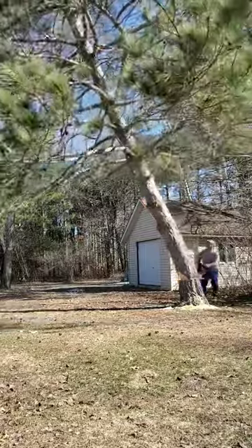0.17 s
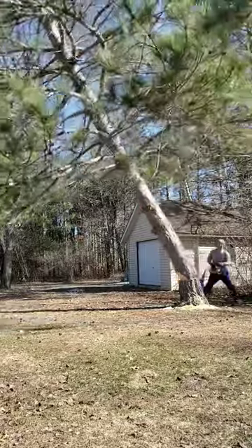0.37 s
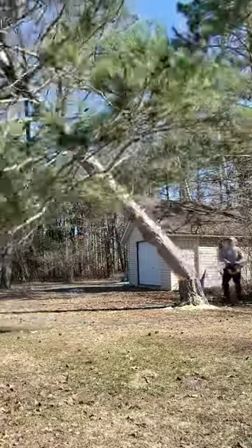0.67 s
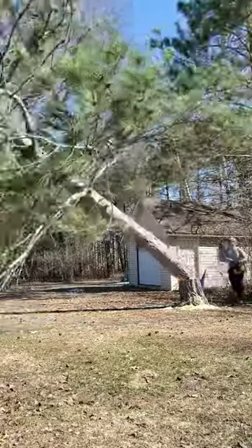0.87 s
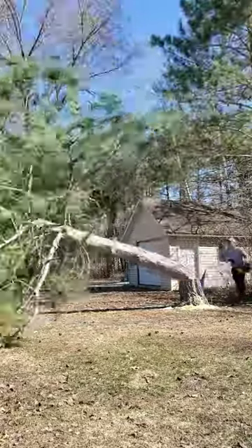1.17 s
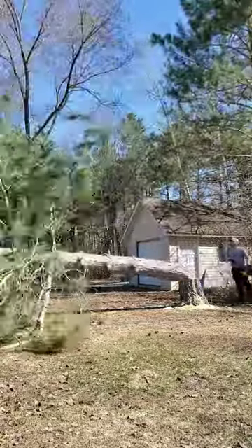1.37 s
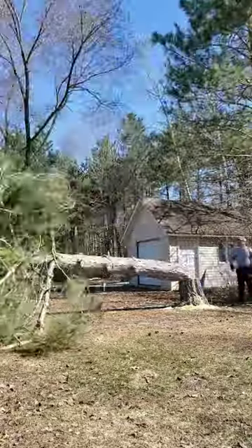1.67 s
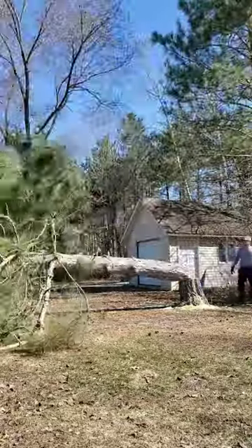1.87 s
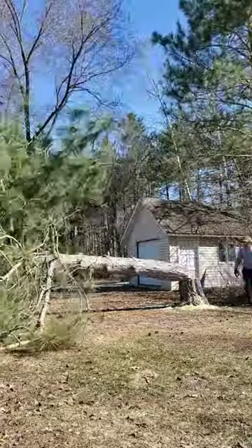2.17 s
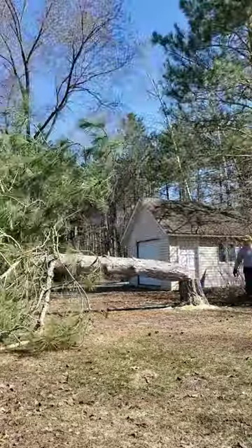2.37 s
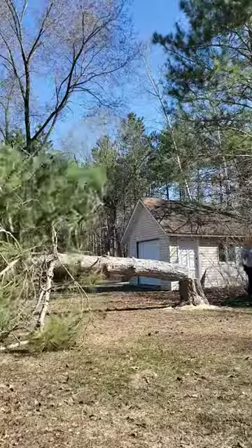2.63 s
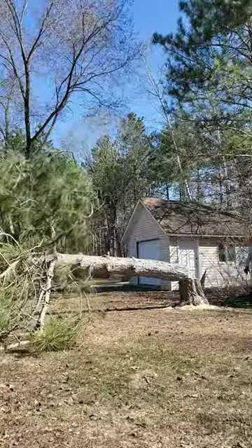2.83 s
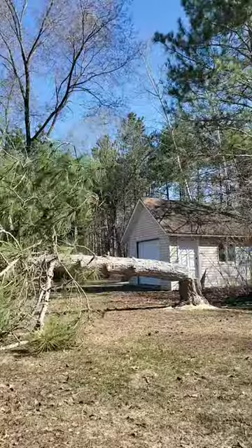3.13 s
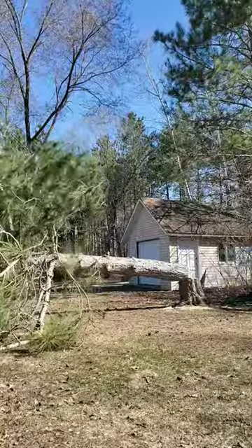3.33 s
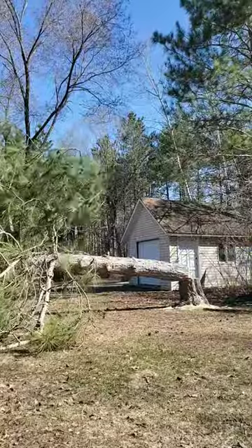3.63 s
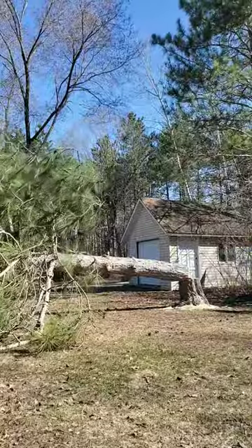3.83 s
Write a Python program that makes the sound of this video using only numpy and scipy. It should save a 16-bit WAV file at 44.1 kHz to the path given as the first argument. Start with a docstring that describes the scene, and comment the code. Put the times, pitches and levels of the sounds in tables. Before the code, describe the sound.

A pine tree cracks, splinters and crashes down in a yard, with wind buffeting the microphone

```python
"""Woodland yard, phone microphone with two ports: from the start gusts buffet each port, over faint distant air.
A pine topples across the yard: limbs snap and splinter for over a second and a half, echoing off trees and shed.
From about one second heavy limbs meet the ground and the crown of needles sweeps it, then sways out by two.
Towards three seconds hard gusts return, with a few faint late snaps. Breaks are shaped bursts of fibre clicks
through wood modes; needles, wind and air are coloured noise; thuds and single buffets are decaying tones."""
import sys
import numpy as np
from scipy import signal
from scipy.fft import rfft, irfft
from scipy.io import wavfile
from scipy.ndimage import uniform_filter1d

SR = 44100
rng = np.random.default_rng(int(sys.argv[2]) if len(sys.argv) > 2 else 0)


def unload_wav(signal):
    """Save mono or channel-first audio to the path in sys.argv[1] as 16-bit WAV at rate SR, clipped to [-1, 1]."""
    wavfile.write(
        sys.argv[1],
        SR,
        np.round(np.clip(np.atleast_2d(signal).T, -1, 1) * 32767).astype(np.int16),
    )


def gain_from_db(level_db):
    """Convert decibel levels to linear amplitude factors (20 dB per decade)."""
    decades = np.asarray(level_db, float) / 20
    return 10 ** decades


N = 4 * SR

# Distant woodland hush. Each row: frequency in Hz, relative density in dB per Hz.
AIR_SPECTRUM = [(40, -34), (150, -4), (350, -0.5), (800, -6), (1350, -20.5), (3000, -37), (6600, -60)]
# Crown sweeping air and ground, before the trim of each layer.
# Each row: time in seconds, swish level in dB, fine hiss level in dB, level of rubbing boughs in dB.
NEEDLE_LEVELS = [(0.0, -49, -95, -44.5), (0.2, -67, -72.5, -64.5), (0.39, -67, -81, -63.5),
                 (0.52, -59.5, -87, -53), (0.66, -60.5, -71, -62), (0.87, -63.5, -80, -60),
                 (1.01, -62.5, -79, -69), (1.1, -51.5, -63, -46.5), (1.22, -50.5, -58, -56.5),
                 (1.36, -49, -61, -46), (1.54, -50.5, -58.5, -54), (1.75, -55.5, -60.5, -54.5),
                 (1.9, -61, -67, -55), (2.06, -68, -72.5, -64), (2.23, -70, -74, -72.5),
                 (2.72, -69, -71, -72.5), (2.92, -67, -72, -82), (3.12, -71, -76.5, -70),
                 (3.78, -72.5, -80.5, -73), (4.0, -73.5, -83, -72)]
# Needles swishing. Each row: frequency in Hz, relative density in dB per Hz.
SWISH_SPECTRUM = [(400, -37), (1200, -10.5), (2200, -2), (4000, 1), (6000, -0.5), (7500, -16.5),
                  (9750, -38)]
# Fine hiss of needles and of breaking wood. Each row: frequency in Hz, relative density in dB per Hz.
HISS_SPECTRUM = [(4410, -3.5), (7500, -2), (9280, 0), (11000, -1.5), (14200, -7), (15500, -10.5)]
# Boughs rubbing. Each row: frequency in Hz, relative density in dB per Hz.
BOUGH_SPECTRUM = [(200, -26), (350, -5), (900, -2), (1500, -2.5), (2400, -11), (4000, -44)]
# Wind on the two ports. Each row: time in seconds, level in dB, left minus right in dB.
GUSTS = [(0.0, -38.5, 25), (0.05, -50, 25), (0.33, -51, 31), (0.45, -57.5, 7), (0.52, -50, 12),
         (0.62, -46, 25), (0.66, -65.5, 14), (0.72, -44, 3), (0.93, -64.5, 7), (1.05, -53.5, 2),
         (1.19, -83, 11), (1.38, -49, -5.5), (1.5, -71, 7), (1.8, -57, 0), (2.0, -66.5, 1), (2.13, -58, 1),
         (2.22, -64.5, 2), (2.745, -63, -2), (2.765, -49, -7), (2.98, -46, -2.5), (3.12, -44, 7),
         (3.25, -41.5, -3), (3.45, -50.5, 1.5), (3.7, -49, 2), (3.8, -45, -11), (4.0, -49.5, -6)]
# Light buffeting of a port. Each row: frequency in Hz, relative density in dB per Hz.
CALM_SPECTRUM = [(20, -3), (70, 0), (240, -21), (450, -31), (1170, -41), (1980, -120)]
# Hard buffeting of a port. Each row: frequency in Hz, relative density in dB per Hz.
STRONG_SPECTRUM = [(20, -18), (64, -1.5), (104, -10.5), (244, -14.5), (682, -41.5), (1200, -72),
                   (2640, -120)]
# Single hard buffets. Each row: start in seconds, level at the louder port in dB, pitch in Hz,
# left minus right in dB.
BUFFETS = [(.009, -25, 58.6, 24), (.022, -28, 64, 23), (0.086, -30.5, 82, 17), (0.136, -35.5, 61, 2),
           (0.287, -37.5, 83, 15), (0.315, -36, 75.6, 28), (.525, -36, 82, 15), (0.696, -31, 66.7, 14),
           (.724, -31, 106, 6), (2.756, -38, 76.5, 10), (2.811, -36.5, 114, 4.5), (2.91, -36, 99, -24),
           (2.953, -33, 85.4, -6), (2.979, -36, 98, -16), (3.066, -27, 81.4, 1), (3.194, -34, 80.4, -5),
           (3.223, -27, 88.6, -8), (3.238, -20, 89.8, 3), (3.286, -24.5, 89, -13), (3.332, -30, 71, -4),
           (3.364, -29, 76, 8), (3.527, -34, 81, -0.5), (3.607, -30, 82.7, -3), (3.645, -29, 127.8, -11),
           (3.672, -28, 70.5, 4), (3.708, -30, 78, 6), (3.755, -27, 150.5, 0), (3.789, -36, 130.5, -24),
           (3.86, -29, 66, -30), (3.935, -36, 64.5, 0.5)]
# Single breaks of limbs and twigs. Each row: time in seconds, level in dB before the common trim,
# centre in Hz, hiss against body in dB before its trim, length in seconds.
SNAPS = [(.005, -30.5, 3060, -24, 0.015), (.024, -29.5, 4340, -10.5, 0.012), (.215, -52.5, 5000, -1, 0.015),
         (.260, -36, 4140, -9.5, 0.015), (.339, -42, 2400, -28, 0.012), (.357, -27.5, 2370, -21, 0.011),
         (.435, -30, 1930, -34, 0.018), (.592, -32.5, 2810, -14, .018), (.661, -26.5, 2590, -24.5, 0.012),
         (.710, -40, 5700, -7, 0.0099), (.762, -25.5, 1950, -21.5, .012), (.783, -26.5, 1680, -45, 0.0143),
         (.850, -25.5, 2410, -26, 0.015), (.995, -32.5, 2640, -18, 0.017), (1.102, -30, 3700, -3.5, 0.02),
         (1.121, -32, 1850, -27, 0.017), (1.141, -28, 2850, -14, 0.013), (1.222, -28.5, 2800, -30, 0.016),
         (1.254, -31, 3100, -31, 0.015), (1.275, -36, 4540, -7, .016), (1.324, -29, 3060, -10.5, 0.02),
         (1.414, -37.5, 2370, -5, 0.014), (1.453, -38, 3440, -27, 0.0068), (1.473, -25.5, 1110, -26, 0.015),
         (1.552, -26.5, 1970, -18, 0.02), (2.334, -51, 3680, -28, 0.027), (2.617, -56.5, 3480, -2, 0.022),
         (2.838, -48.5, 4630, -16, 0.014), (2.958, -59.5, 4300, 2, 0.033), (3.391, -54, 2040, -8, 0.012)]
# Wood tearing along the grain. Each row: time in seconds, level in dB before the common trim,
# centre in Hz, hiss against body in dB before its trim, length in seconds.
TEARS = [(.040, -44, 1430, -30, 0.051), (.380, -47, 2640, -19, 0.052), (.451, -27, 1208, -62, 0.045),
         (.468, -28, 3430, -54, 0.031), (.488, -32, 1310, -50, 0.061), (.522, -35.5, 1160, -32, .03),
         (.543, -32, 2310, -25, 0.035), (.575, -36.5, 1220, -31, 0.048), (.675, -41.5, 1500, -40, 0.036),
         (.804, -30, 1290, -34, 0.041), (.832, -29.5, 1170, -41, 0.038), (.883, -32.5, 2740, -18.5, 0.043),
         (.915, -45.5, 1790, -15, 0.047), (.958, -28.5, 1710, -46, 0.024), (1.021, -30, 930, -21.5, 0.044),
         (1.048, -34, 1150, -13, .04), (1.158, -32, 2660, -8.5, 0.038), (1.342, -33.5, 1090, -21, .035),
         (1.370, -30.5, 4260, -7.5, 0.04), (1.392, -40.5, 1750, -1, .045), (1.503, -39, 2400, -3.5, .035),
         (1.585, -36.5, 1830, -6, 0.052), (1.652, -38, 2100, -4.5, 0.054)]
# Body of splintering wood. Each row: frequency in Hz, relative density in dB per Hz.
WOOD_SPECTRUM = [(120, -30), (300, -16.5), (600, -17), (1100, -24), (3790, -15.5), (7500, -34),
                 (16500, -120)]
# Modes of a limb. Each row: frequency in Hz, relative level in dB, nominal ring time in seconds.
LIMB_MODES = [(650, 23, 0.025), (776, 22, 0.0096), (1170, 20, 0.024), (1330, 11.5, 0.0066),
              (2338, 4.5, 0.047), (2640, -11, 0.027), (3580, -14, 0.048), (3990, -17, 0.016)]
# Heavy limbs meeting the ground. Each row: start in seconds, level in dB, pitch in Hz.
THUDS = [(0.997, -45, 426), (1.04, -45.5, 124), (1.473, -40.5, 218), (1.553, -40.5, 229)]
# Echoes off trees and shed. Each row: frequency in Hz, time to fall by 60 dB in seconds.
YARD_DECAY = [(300, 0.31), (1200, 0.8), (3500, 0.41), (12000, 0.074)]
# Brief dips of the whole sound. Each row: middle in seconds, length in seconds, depth in dB.
DIPS = [(0.345, 0.0091, -5), (0.426, 0.014, -10.5), (0.647, 0.011, -6), (0.764, 0.026, -5.5),
        (1.101, 0.045, -8.5), (1.238, 0.022, -6)]


def evened(x):
    """Scales to unit rms."""
    return x / np.sqrt(np.mean(x ** 2) + 1e-20)


def read(points, hz):
    """Reads a table of (Hz, value) along a logarithmic frequency axis."""
    f, value = np.transpose(points)
    return np.interp(np.log(hz + 1), np.log(f + 1), value)


def column(table, index, t):
    """Follows one column of a table timed by its first column."""
    rows = np.array(table)
    return np.interp(t, rows[:, 0], rows[:, index])


def coloured(x, gain):
    """Filters rows of x by a gain given on the bins of their transform."""
    return irfft(rfft(x) * gain, x.shape[-1])


def drift(seconds, shape):
    """Slow chance of unit rms along the last axis: noise averaged twice."""
    size = max(int(seconds * SR), 2)
    smooth = uniform_filter1d(rng.standard_normal(shape), size)
    return evened(uniform_filter1d(smooth, size))


def patchy(spectrum, patchy_db, flicker_db):
    """Noise drawn apart for each port, with small patches and a flicker shared by both."""
    frames, hz = N // 64 + 5, np.fft.rfftfreq(256, 1 / SR)
    z = rng.standard_normal((2, 129, frames)) + 1j * rng.standard_normal((2, 129, frames))
    patches = uniform_filter1d(rng.standard_normal((129, frames)), 10, axis=0)
    patches = evened(uniform_filter1d(patches, 24, axis=1))
    flicker = evened(uniform_filter1d(rng.standard_normal(frames), size=9))
    z *= gain_from_db(read(spectrum, hz)[:, None] + patchy_db * patches + flicker_db * flicker)
    noise = signal.istft(z, nperseg=256, noverlap=192)[1]
    return evened(noise[:, :N])


def add(mix, s, sound):
    """Lays a sound into the mix from s seconds, trimmed at both ends of the mix."""
    skip = max(-round(s * SR), 0)
    part = mix[:, max(round(s * SR), 0):][:, :sound.shape[1] - skip]
    part += sound[:, skip:skip + part.shape[1]]


def air():
    """Distant woodland hush: steady coloured noise, drawn apart for each port."""
    hz = np.fft.rfftfreq(N, 1 / SR)
    noise = rng.standard_normal((2, N))
    return gain_from_db(-68) * evened(coloured(noise, gain_from_db(read(AIR_SPECTRUM, hz))))


def twigs():
    """Sparse small cracks of eight sizes, each a short rough ring."""
    PER_S, T60_S, RISE_S = 18, 0.036, 0.00084  # rate is for each size
    t, out = np.arange(900) / SR, np.zeros((2, N))
    for hz in np.geomspace(900, 5500, 8):
        strength = gain_from_db(1.6 * np.minimum(rng.exponential(1, N), 2.5))
        train = (rng.random(N) < PER_S / SR) * strength
        rough = evened(uniform_filter1d(rng.standard_normal((2, 900)), size=12))
        envelope = gain_from_db(-60 * t / T60_S) * np.minimum(t / RISE_S, 1)
        ring = rough * np.sin(2 * np.pi * hz * t) * envelope
        out += signal.oaconvolve(train[None], ring, axes=1)[:, :N]
    return gain_from_db(-2.5) * evened(out)


def needles(t):
    """Crown of needles: a broad swish with twigs and a fine hiss, grainy with ticks, over lumpy boughs."""
    ticks = 1 + 0.13 * np.clip(drift(0.00078, N) - 1.2, 0, 1.4) ** 2
    swish = patchy(SWISH_SPECTRUM, patchy_db=2.0, flicker_db=-1.0) + twigs()
    hiss = patchy(HISS_SPECTRUM, patchy_db=0.7, flicker_db=1.5)
    boughs = patchy(BOUGH_SPECTRUM, patchy_db=3.5, flicker_db=0)
    swish = swish * gain_from_db(column(NEEDLE_LEVELS, 1, t) + 1.0)
    hiss = hiss * gain_from_db(column(NEEDLE_LEVELS, 2, t) + 6.0)
    boughs = boughs * gain_from_db(column(NEEDLE_LEVELS, 3, t) - 0.5)
    return ticks * (swish + hiss) + boughs


def wind(t):
    """Lumpy eddies, mostly separate on each port; hard gusts take another colour; single buffets on top."""
    CALM_DB, STRONG_DB = -54, -36  # gust levels of purely light and purely hard buffeting
    BOTH, STEADY = 0.14, 0.39  # share crossing to the other port; how far swells are evened out
    LUMP_DB, LUMP_S, BUFFET_T60_S = 5.5, 0.012, 0.16
    hz, db = np.fft.rfftfreq(N, 1 / SR), column(GUSTS, 1, t)
    eddies = rng.standard_normal((2, N))
    eddies = eddies + BOTH * eddies[::-1]
    calm = evened(coloured(eddies, gain_from_db(read(CALM_SPECTRUM, hz))))
    strong = evened(coloured(eddies, gain_from_db(read(STRONG_SPECTRUM, hz))))
    hard = np.clip((db - CALM_DB) / (STRONG_DB - CALM_DB), 0, 1)
    flow = (1 - hard) * calm + hard * strong
    power = uniform_filter1d(uniform_filter1d(flow ** 2, size=1500), size=1500)
    swell = np.sqrt(power + 0.011)
    lumps = gain_from_db(LUMP_DB * drift(LUMP_S, (2, N)))
    # the lean between the ports leaves their joint power alone
    lean = gain_from_db(np.clip(column(GUSTS, 2, t), -30, 30) * np.array([[.5], [-.5]]))
    lean = lean / np.sqrt((lean ** 2).mean(0))
    mix = gain_from_db(db) * lean * evened(flow / swell ** STEADY * lumps)
    for row in BUFFETS:
        add(mix, *thud(*row, BUFFET_T60_S))
    return mix


def crack(start, db, centre_hz, treble_db, length, rise, fall):
    """A burst of fibres parting, coloured by the limb's size, ringing in its modes and in loose splinters."""
    FIBRES_PER_S, FIBRE_SPREAD_DB, GRIT_DB, GRIT_S = 9000, 5.5, 1.8, .003
    WIDTH_OCT, BODY_DB, RING_DB, SPLINTER_DB = 0.42, 1, -2.5, -2.5
    LEVEL_TRIM_DB, HISS_TRIM_DB = -9, 3
    LIMB_SPREAD = .07  # modes shift by up to this share from break to break
    size, length = 8192, np.clip(length, .004, .1)
    t, hz = np.arange(size) / SR, np.fft.rfftfreq(size, 1 / SR)
    u = t / length
    falling = np.exp(-((u - rise) / (0.71 * (1 - rise))) ** fall)
    shape = np.where(u < rise, (u / rise) ** 1.5, falling)
    draw = rng.random((3, 2, size))
    clicks = (draw[0] < FIBRES_PER_S / SR) * np.sign(draw[1] - .5)
    fibres = clicks * gain_from_db(-FIBRE_SPREAD_DB * np.log(draw[2] + 0.014))
    grit = gain_from_db(GRIT_DB * drift(GRIT_S, size))
    fibres = evened(fibres * grit * shape) * np.sqrt(np.mean(shape ** 2))

    hump = np.exp(-.5 * (np.log2((hz + 1) / centre_hz) / WIDTH_OCT) ** 2) * (hz < 7300)
    limb = 1 + LIMB_SPREAD * (2 * draw[2, 0, 0] - 1)
    ring = 0
    for f, mode_db, ring_s in LIMB_MODES:
        nearness = np.exp(-.5 * (np.log2(f / centre_hz) / 0.48) ** 2)  # modes near the centre speak most
        ring = ring + gain_from_db(mode_db) * nearness / (1 + 2j * (hz - f * limb) * ring_s / 1.4)
    loose_hz = np.minimum(centre_hz * 2 ** (1.15 * (2 * draw[0, 0, :6] - 1)), 6800)
    splinters = sum(1 / (1 + 2j * (hz - f) * 0.02 / 1.13) for f in loose_hz)
    low = evened(hump) + gain_from_db(BODY_DB) * evened(gain_from_db(read(WOOD_SPECTRUM, hz)))
    for modes, modes_db in ((ring, RING_DB), (splinters, SPLINTER_DB)):
        low = low + gain_from_db(modes_db) * modes / np.sqrt(np.mean(abs(modes) ** 2))
    low = low / np.sqrt(np.mean(abs(low) ** 2))
    high = gain_from_db(treble_db + HISS_TRIM_DB) * evened(gain_from_db(read(HISS_SPECTRUM, hz)))
    sound = gain_from_db(db + LEVEL_TRIM_DB) * coloured(fibres, low + high)
    return start - .3 * rise * length, sound


def limbs():
    """The falling wood: sharp snaps, slower tears and ground thuds, with their echoes across the yard."""
    mix = np.zeros((2, N))
    # rise is a share of the length, fall a power
    for table, rise, fall in ((SNAPS, .33, 1.15), (TEARS, .25, 2.8)):
        for row in table:
            add(mix, *crack(*row, rise, fall))
    for row in THUDS:
        add(mix, *thud(*row, pan_db=0, t60=0.081))
    return mix + gain_from_db(-15.5) * yard(mix)


def thud(start, db, hz, pan_db, t60):
    """A dull push of wavering pitch that dies at once, for a limb on the ground or a buffet on the ports."""
    t = np.arange(8192) / SR
    wobble = 1 + 0.16 * (drift(0.0081, 8192) + 0.75 * drift(0.0079, (2, 8192)))
    port_db = db + pan_db * np.array([[.5], [-.5]]) - .5 * abs(pan_db)
    level = gain_from_db(port_db - 60 * t / t60) * np.minimum(t * hz / 0.44, 1)
    turn = 2 * np.pi * np.cumsum(hz * wobble, axis=1) / SR
    return start, level * np.sin(turn + 0.35 * np.sin(turn))


def yard(x):
    """Sparse echoes of random sign off trees and shed, each band dying at its own speed."""
    taps = np.zeros((2, SR))
    at = np.arange(400, SR - 20, 20) + rng.integers(0, 20, (2, (SR - 401) // 20))
    np.put_along_axis(taps, at, rng.choice([-1., 1.], at.shape), 1)
    hz, t, z = signal.stft(taps, SR, nperseg=256)
    t60 = np.maximum(read(YARD_DECAY, hz), .02)[:, None]
    tail = signal.istft(z * gain_from_db(-60 * t / t60), SR, nperseg=256)[1]
    return signal.fftconvolve(x, tail / np.linalg.norm(tail[0]), axes=1)[:, :N]


def scene():
    """Sums all layers at the ports; the whole level dips briefly a few times."""
    t = np.arange(N) / SR
    dip_db = sum(db * np.exp(-((t - s) / (.5 * length)) ** 4) for s, length, db in DIPS)
    return (limbs() + needles(t) + wind(t) + air()) * gain_from_db(dip_db)


def low_pass(x):
    """Removes everything above the highest recorded frequency."""
    return signal.sosfilt(signal.butter(12, 15680, fs=SR, output="sos"), x)


def record(dry):
    """The microphone port: a notch in the treble, a bass cut and a band limit."""
    NOTCH_HZ, NOTCH_WIDTH_HZ, NOTCH_DEPTH = 7700, 330, .5
    BASS_CUT_HZ, EDGE_HZ = 24, 15620
    hz = np.fft.rfftfreq(N, 1 / SR)
    notch = 1 - NOTCH_DEPTH * np.exp(-((hz - NOTCH_HZ) / NOTCH_WIDTH_HZ) ** 2)
    bass_cut = (1j * hz / (BASS_CUT_HZ + 1j * hz)) ** 2
    mix = coloured(dry, notch * bass_cut * (hz < EDGE_HZ))
    return low_pass(mix)


dry = scene()
out = record(dry)
unload_wav(out)
```